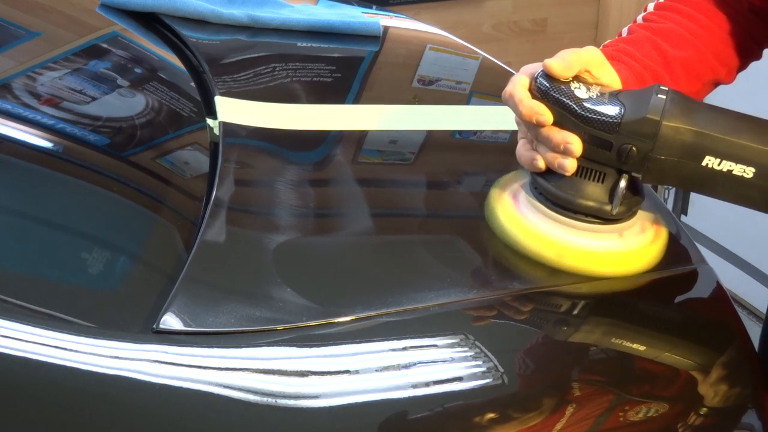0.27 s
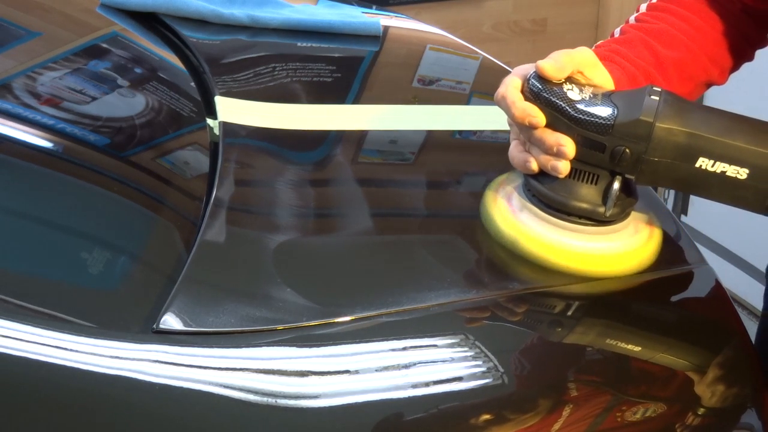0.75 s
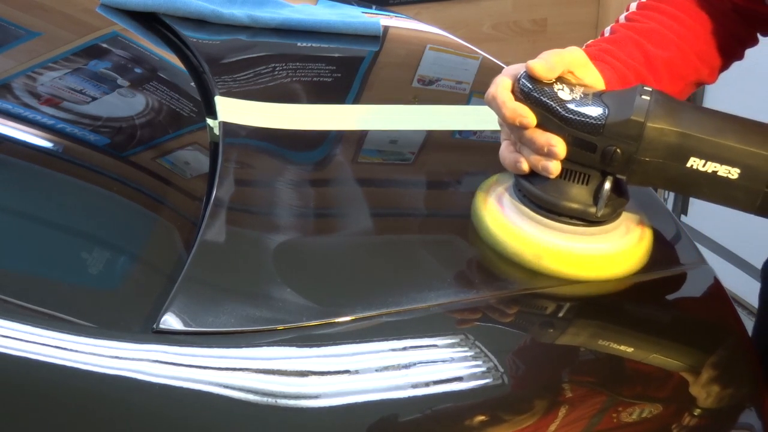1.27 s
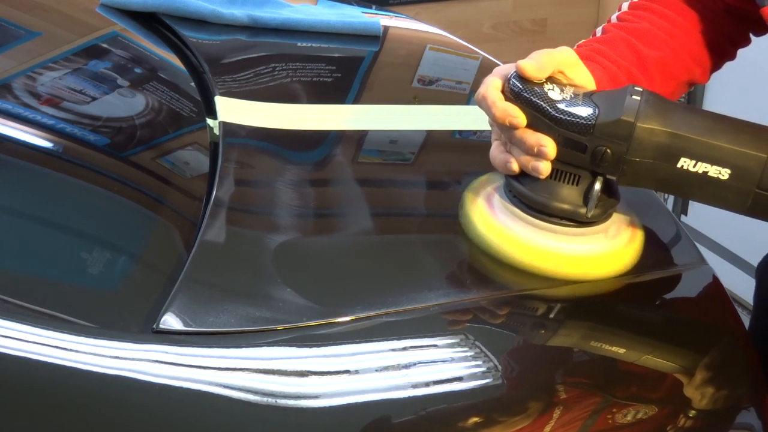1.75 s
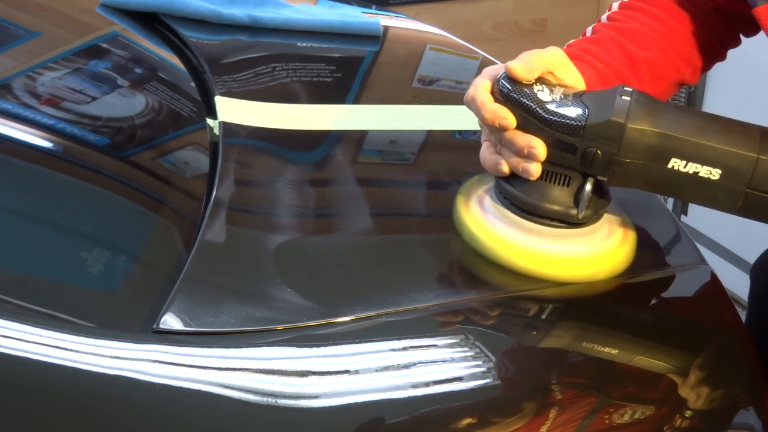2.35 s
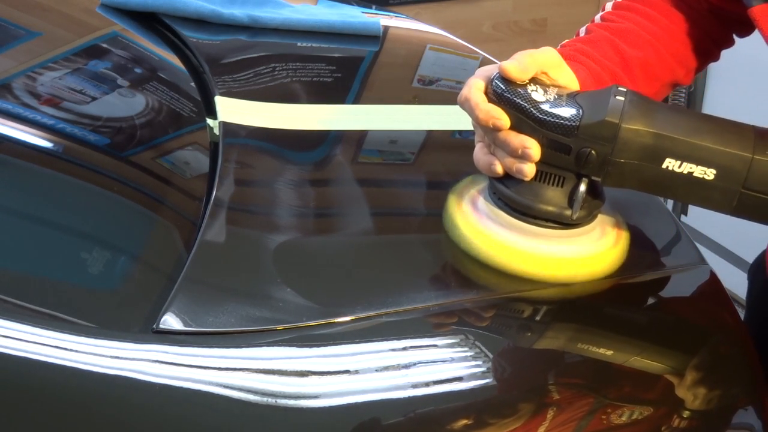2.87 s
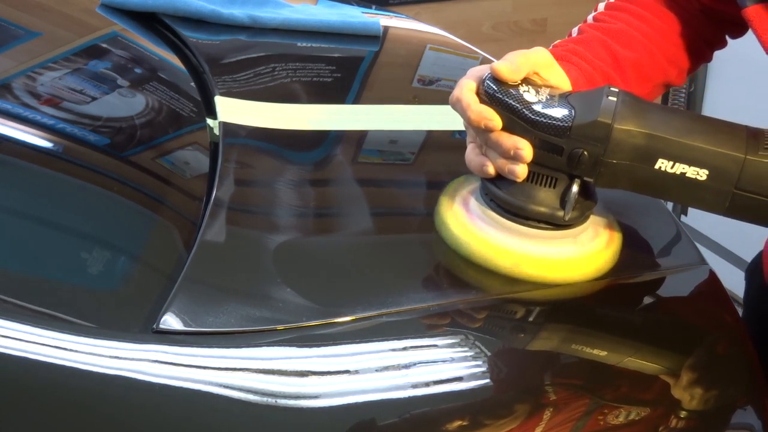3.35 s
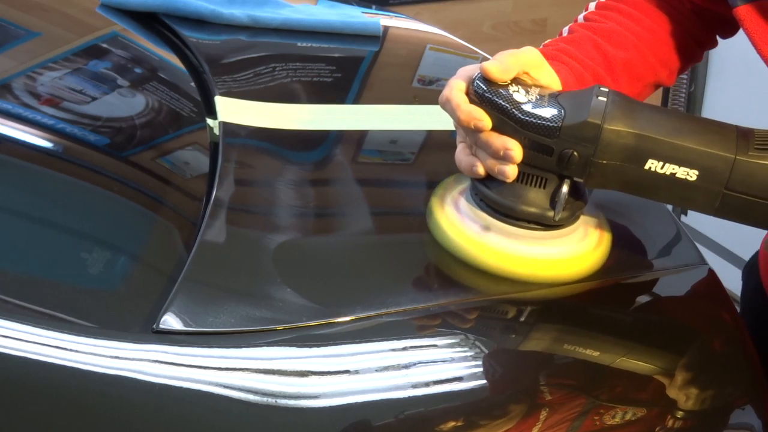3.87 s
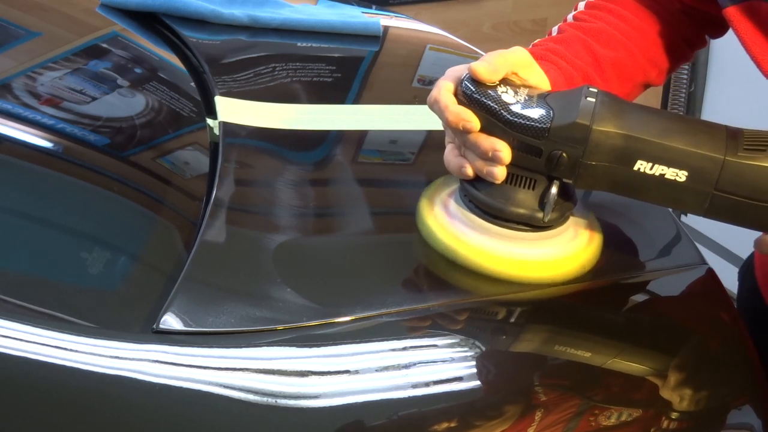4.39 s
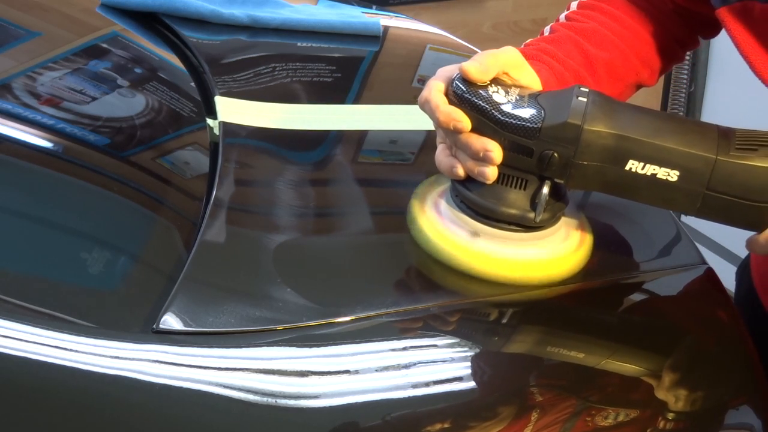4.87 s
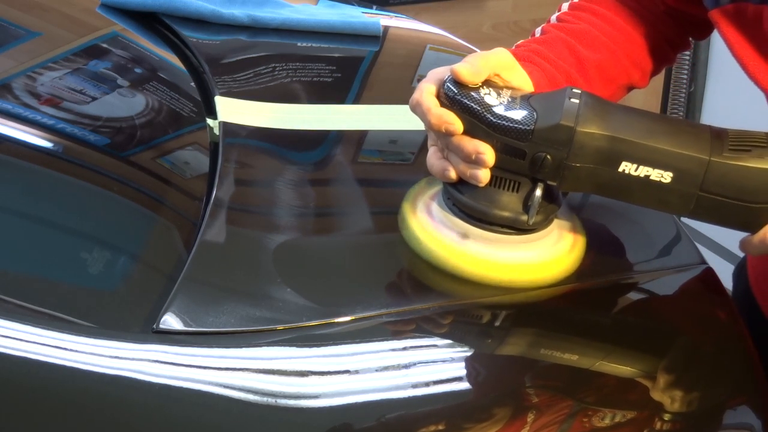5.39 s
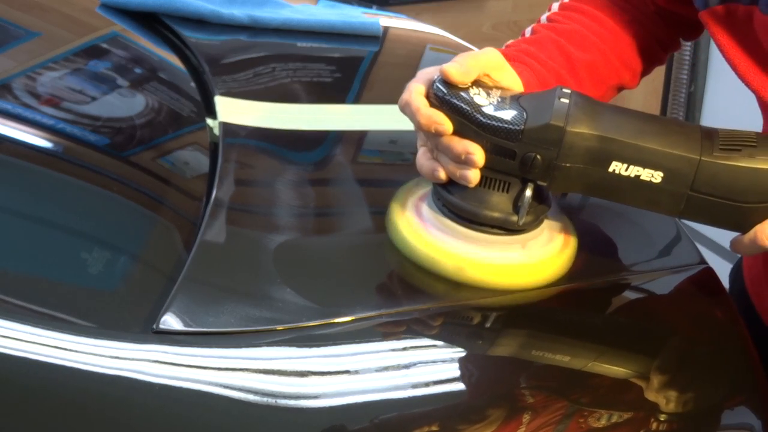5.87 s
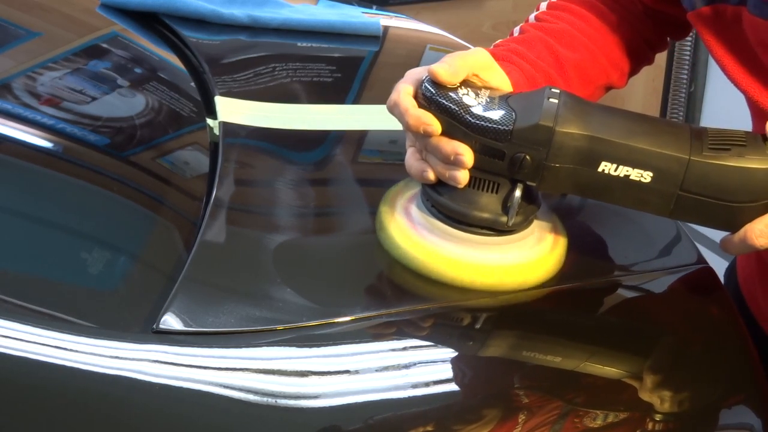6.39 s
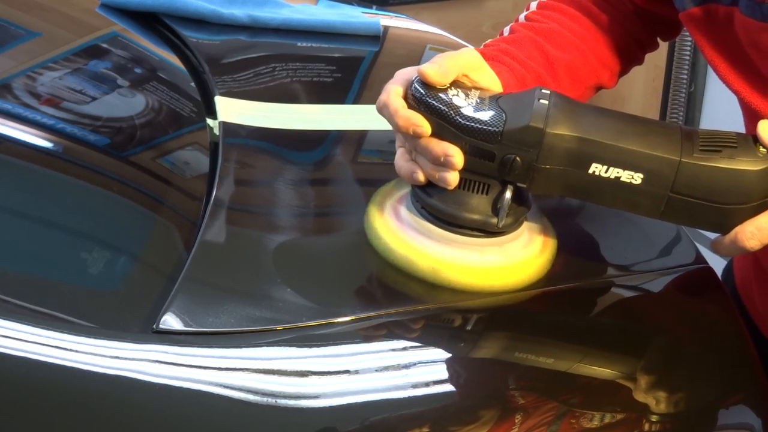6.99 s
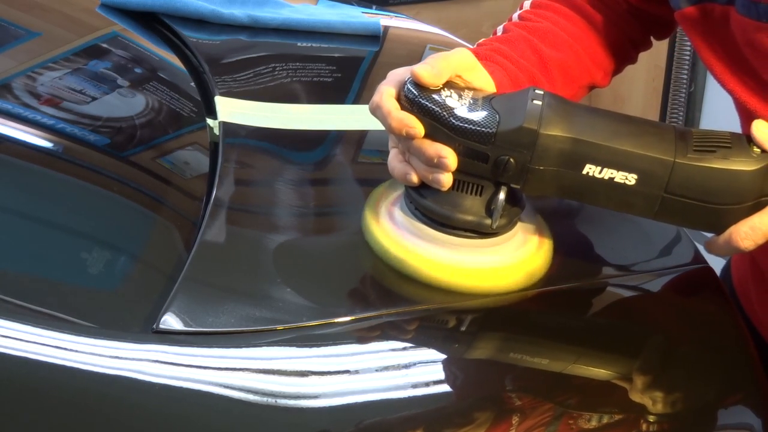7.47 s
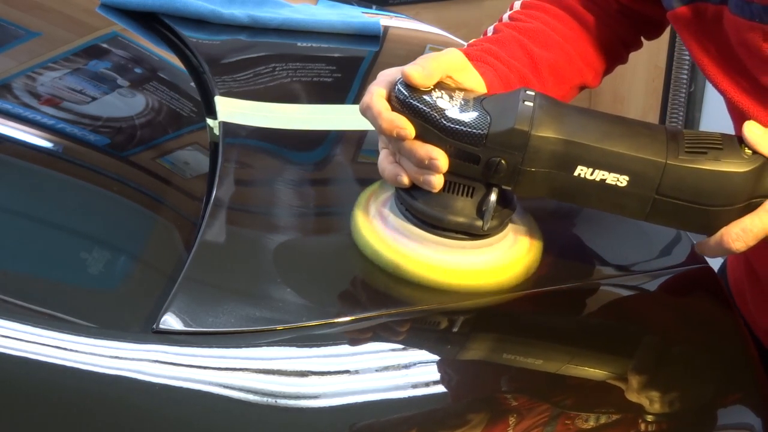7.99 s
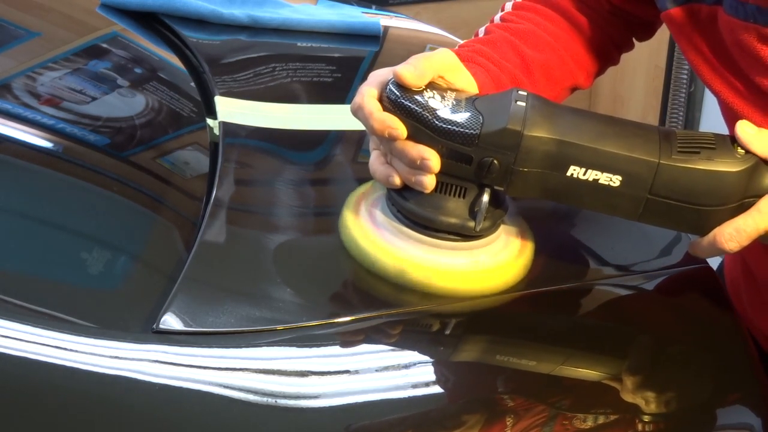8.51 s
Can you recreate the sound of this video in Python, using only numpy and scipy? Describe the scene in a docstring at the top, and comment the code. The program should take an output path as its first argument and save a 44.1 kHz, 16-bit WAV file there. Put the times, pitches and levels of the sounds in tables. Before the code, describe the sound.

An electric orbital polisher runs without a break on a car panel in a workshop, heard close and slightly to the right in stereo. A steady mid-low hum carries a dense geared whine, cooling air and brush hiss, while foam rubs softly. Single tones swell and fade; halfway through, the hand presses harder, the hum weakens and a thin whistle comes forward, then the motor speeds up very slightly.

```python
"""An electric random-orbital polisher is guided slowly over a car's painted panel in a workshop.
From the start the motor hums and whines near 368 turns a second, its 9:43 bevel gear driving the orbiting
pad; foam rubs, cooling air rushes and carbon brushes hiss. Bodywork reflections make single tones swell
and fade. Near 5 s the hand bears down and the pad spins slower; a thin whistle is heard near 4.7 and 6.5 s.
The hum weakens until nearly 8 s and partly recovers as the motor speeds up to 371 turns a second."""
import sys
import numpy as np
from scipy import signal
from scipy.fft import rfft, irfft, next_fast_len
from scipy.io import wavfile
from scipy.ndimage import map_coordinates

SR = 44100
rng = np.random.default_rng(int(sys.argv[2]) if len(sys.argv) > 2 else 0)


def unload_audio(sound):
    """Save the sound as a 16-bit wav file, at the path given as the first command line argument."""
    columns = np.transpose(np.atleast_2d(sound))
    # keep every value between -1 and 1, then stretch to whole-number steps
    steps = np.round(np.clip(columns, -1, 1) * 32767)
    wavfile.write(sys.argv[1], SR, steps.astype(np.int16))


N = 385434
TIME = np.arange(N) / SR
SIDES = np.array([[1], [-1]])  # left, right
PINION_TEETH, CROWN_TEETH = 9, 43


def gain_of(db):
    """Decibels to amplitude."""
    return 10 ** (np.asarray(db) / 20)


def evened(x):
    """Scales to rms 1."""
    return x / np.sqrt(np.mean(abs(x) ** 2) + 1e-20)


def curves(rows):
    """Each column of a table as a curve in time."""
    s, *columns = np.transpose(rows)
    return [np.interp(TIME, s, column) for column in columns]


def bell(s, width_s):
    """Smooth rise to 1 and fall around a moment."""
    return np.exp(-((TIME - s) / width_s) ** 2)


def read(points, hz):
    """Table values at the given frequencies, interpolated over log frequency."""
    f, value = np.transpose(points)
    return np.interp(np.log(hz + 1), np.log(f + 1), value)


def drift(top_hz):
    """Random wander of rms about 1: sines from a tenth of the top rate up to it."""
    hz = np.geomspace(top_hz / 10, top_hz, num=20)[:, None]
    coarse_s = TIME[::256]
    sines = np.sin(2 * np.pi * (hz * coarse_s + rng.random(hz.shape)))
    return np.interp(TIME, coarse_s, evened(sines.sum(0)))


def scatter(shape):
    """Complex random gains of rms 1."""
    return (rng.standard_normal(shape) + 1j * rng.standard_normal(shape)) / np.sqrt(2)


def rush(spectrum, apart, ripple_db):
    """Coloured noise on two microphones, rippled by the many small resonances of housing and room."""
    size = next_fast_len(N)
    hz = np.fft.rfftfreq(size, 1 / SR)
    grid_hz = np.arange(0, SR / 2, 45)
    ripple = np.interp(hz, grid_hz, rng.standard_normal(len(grid_hz)))
    bins = scatter(len(hz)) + apart * SIDES * scatter(len(hz))
    noise = irfft(bins * gain_of(read(spectrum, hz) + ripple_db * ripple), size)[:, :N]
    return noise / noise.mean(0).std()


def tone(turns, db, apart):
    """One partial, with a small random waver between left and right."""
    angle = 2 * np.pi * (turns + rng.random())
    side = drift(9.6) * np.cos(angle) + drift(11) * np.sin(angle)
    return gain_of(db) * (np.sqrt(2) * np.cos(angle) + apart * SIDES * side)


def rotor(turns, orders, db, fading, apart, count=12, size=8192):
    """A sound that repeats every turn; its partials fade in and out along the path of the tool."""
    shared, side = signal.resample(scatter((2, count, len(orders))), count * 10, axis=1)
    gains = np.exp(2j * np.pi * rng.random(len(orders))) + fading * shared
    gains /= np.sqrt(np.mean(abs(gains) ** 2, axis=0))
    bins = np.zeros((2, len(gains), size // 2 + 1), complex)
    stereo = np.array([gains + apart * side, gains - apart * side])
    bins[:, :, np.round(orders).astype(int)] = stereo * gain_of(db)
    cycles = irfft(bins, size) * size / np.sqrt(2)
    # read each cycle by shaft angle while crossfading along the path
    place = [np.linspace(0, len(gains) - 1, N), turns % 1 * size]
    return np.array([map_coordinates(c, place, order=1, mode="grid-wrap") for c in cycles])


def whine(track, spin, course, flutter_db, rough_db):
    """One tone that swells and fades over time, its level varying with each spin of the pad."""
    level_db, crossings = course
    path_db = sum(change_db * bell(s, width_s) for s, width_s, change_db in crossings)
    waver_db = flutter_db * np.cos(2 * np.pi * spin) + rough_db * drift(14)
    return tone(track, level_db + path_db + waver_db, apart=.22)


def pad_spin():
    """Turns of the pad about its own centre; it slows once, as the hand bears down."""
    free_hz, pressed_hz, slows_at_s, slows_over_s = 4.25, 3.63, 5.0, .3
    facing_s = 6.94  # reflection in step with the hum: turn zero
    slowed = (1 + np.tanh((TIME - slows_at_s) / slows_over_s)) / 2
    spin = np.cumsum(free_hz + (pressed_hz - free_hz) * slowed) / SR
    return spin - np.interp(facing_s, TIME, spin)


def hum(turns, spin, hum_db):
    """The armature's hum beats with its reflection off the spinning pad, deeply where the direct path is weak."""
    echo_db, rise_db, rise_at_s, rise_width_s = -41.5, 9, 6.95, 1.2
    echo_gain = gain_of(echo_db + rise_db * bell(rise_at_s, rise_width_s))
    both = gain_of(hum_db + 1.07) + echo_gain * np.exp(-2j * np.pi * spin)
    return abs(both) * tone(turns + np.angle(both) / (2 * np.pi), 0.38 * drift(10), apart=.11)


def motor(turns, press_db):
    """Overtones of the hum grow with the load; commutator bars whine above."""
    # Each row: cycles per motor turn, relative level in dB.
    motor_partials = [(3, -46.2), (5, -52.5), (6, -43.1), (7, -43.4), (8, -48.7), (10, -50.3), (11, -51.7),
                      (13, -47.3), (15, -52.1), (16, -46.0), (17, -47.1), (19, -44.3), (20, -52.3),
                      (21, -49.4), (22, -39.6), (23, -34.1), (24, -33.1), (25, -40.6), (26, -36.0),
                      (27, -34.6), (28, -48.0), (29, -48.6)]
    orders, db = np.transpose(motor_partials)
    low = orders < 5.5
    drone = rotor(turns, orders[low], db[low], fading=0.53, apart=.22)
    bars = rotor(turns, orders[~low], db[~low], fading=.5, apart=.22)
    drone_db = -0.9 + 1.4 * press_db + 0.63 * drift(8.7)
    return drone * gain_of(drone_db) + bars * gain_of(0.16 + 0.86 * press_db)


def whines(turns, orbit, spin):
    """Hum overtones, tooth mesh and its octave, a motor order and two crown-wheel orders."""
    # Each course: base level in dB, then rows of the crossing of a standing wave's crest or node:
    # moment in seconds, half width in seconds, change in dB.
    hum_octave = (-43, [(8.35, .7, 7.5)])
    hum_double_octave = (-53.5, [(2.3, 2.4, 8.6)])
    mesh_course = (-37, [(7.2, 0.33, -18)])
    mesh_octave = (-35, [(0, 1.1, -4), (6.8, 1.4, -14)])
    motor_whine = (-34.5, [(.6, 0.3, 7), (1.65, 1, -13), (6.3, 0.53, -6), (7.4, .4, 3.5),
                   (8.25, 0.37, -11)])
    low_gear_whine = (-34.5, [(7.45, 0.79, -6)])
    high_gear_whine = (-32, [(.5, 4.6, -6.5), (7.2, .2, -6), (8.25, .8, -18)])
    mesh = PINION_TEETH * turns
    voices = [
        (2 * turns, hum_octave), (4 * turns, hum_double_octave),
        (mesh, mesh_course), (2 * mesh, mesh_octave), (12 * turns, motor_whine),
        (31 * orbit, low_gear_whine), (47 * orbit, high_gear_whine)]
    return sum(whine(track, spin + rng.random(), course, flutter_db=1.25, rough_db=0.82)
               for track, course in voices)


def gear(orbit):
    """Uneven teeth repeat their pattern every orbit: strong partials over a dense, faint buzz."""
    # Uneven teeth of the crown wheel. Each row: cycles per orbit, relative level in dB.
    tooth_partials = [(4, -46), (5, -41), (8, -48), (19, -47), (29, -45), (35, -41), (36, -46), (37, -44),
                      (39, -48), (40, -43), (44, -41), (45, -46), (46, -48), (49, -49), (54, -45),
                      (55, -47), (56, -43), (57, -43), (59, -43), (60, -45), (83, -45), (85, -46),
                      (96, -48), (107, -45), (108, -46), (111, -46), (115, -43)]
    orders, db = np.transpose(tooth_partials)
    faint = np.setdiff1d(np.arange(28, 130), np.round(orders))
    buzz_db = -53.5 + 2.0 * rng.standard_normal(len(faint))
    strong = gain_of(-1.5) * rotor(orbit, orders, db, fading=0.53, apart=0.39)
    return strong + rotor(orbit, faint, buzz_db, fading=1.0, apart=0.33)


def throb(orbit, press_db):
    """The eccentric shakes the panel once an orbit; pressing harder brings out the overtones."""
    # Overtones of the shaking panel. Each row: cycles per orbit, dB against the throb at usual pressure.
    shake = [(2, -6), (3, -24), (6, -25)]
    throb_db = -31.9 + 1.1 * press_db
    sound = tone(orbit, throb_db - .3 + .4 * drift(6), apart=.11)
    for k, db in shake:
        sound += tone(k * orbit, throb_db + db + 0.53 * k * press_db + drift(7.1), apart=0.13)
    return sound


def rocking(turns, orbit, press_db):
    """The orbit rocks the motor, setting a side tone on each side of its hum."""
    db = -49.5 + 4.0 * press_db
    return sum(tone(turns + side * orbit, db + drift(4), apart=.2) for side in (-1, 1))


def pad(orbit, spin, press_db):
    """Foam scrubs to and fro, gripping unevenly as the pad turns."""
    # Foam on the panel. Each row: frequency in Hz, relative density in dB per Hz.
    foam_spectrum = [(12, -31), (24, -17), (54, -4), (86, -4.5), (120, -9.5), (224, -12.5), (343, -5),
                     (368, -1.5), (447, -7), (672, -4.5), (721, -2), (831, -4.5), (1657, -10), (2049, -12),
                     (2500, -32.5)]
    stroke = 1 + .08 * np.cos(2 * np.pi * orbit) + 0.087 * np.cos(2 * np.pi * 2 * orbit)
    grip_db = .5 * np.cos(2 * np.pi * spin) + 0.85 * drift(25)
    foam = rush(foam_spectrum, apart=0.26, ripple_db=2.74)
    return foam * stroke * gain_of(-30.5 + .9 * press_db + grip_db)


def housing(hum_db):
    """Turbulence rings in the motor housing; it carries as well or as badly as the hum does."""
    # Air resonances. Each row: frequency in Hz, width in Hz, relative level in dB.
    resonances = [(343, 91, 0.5), (518.4, 18, -2), (601, 46, -0.5)]
    hz = np.fft.rfftfreq(N, 1 / SR)
    cavity = sum(gain_of(db) / (1 + (2 * (hz - f) / width) ** 2) for f, width, db in resonances)
    noise = irfft(cavity * (scatter(len(hz)) + 0.25 * SIDES * scatter(len(hz))), N)
    return evened(noise) * gain_of(hum_db - 14.0 + 1.7 * drift(13))


def air(orbit, press_db):
    """Cooling air and gear rustle, fluttering with the orbit."""
    # Each row: frequency in Hz, relative density in dB per Hz.
    air_spectrum = [(1700, -21), (2049, -10), (2230, -1.5), (2886, 0.5), (3010, 0), (3451, -5.5), (3599, 2),
                    (4020, -4.5), (4419, 1.5), (5175, -6), (5720, -5.5), (6456, -3), (7600, -6),
                    (8300, -33)]
    lobes = 3 * orbit
    flutter = 1 + 0.12 * np.cos(2 * np.pi * orbit) + .14 * np.cos(2 * np.pi * lobes)
    level_db = -26.0 + 0.9 * press_db + 0.93 * drift(12)
    return rush(air_spectrum, apart=0.24, ripple_db=3.1) * flutter * gain_of(level_db)


def brushes(turns, orbit, press_db):
    """Two carbon brushes scrape the commutator, pulsing with the mains current and the gear load."""
    # Each row: frequency in Hz, relative density in dB per Hz.
    brush_spectrum = [(7000, -47), (7500, -15), (8278, 0.5), (9770, -5.5), (9919, -3.5), (10195, -10.5),
                      (10949, -10), (11800, -46)]
    passes, lobes, mains = 2 * turns, 3 * orbit, 100 * TIME
    pulses = [(passes, .27), (lobes, .2), (mains, .14), (orbit, .12)]  # (cycles, depth)
    contact = 1 + sum(depth * np.cos(2 * np.pi * cycles) for cycles, depth in pulses)
    level_db = -25.0 + 0.42 * press_db + 0.58 * drift(12)
    return rush(brush_spectrum, apart=0.21, ripple_db=4.5) * contact * gain_of(level_db)


def workshop():
    """Faint, diffuse rumble of the room."""
    # Each row: frequency in Hz, relative density in dB per Hz.
    rumble_spectrum = [(12, -8), (30, 1), (55, 10), (130, -9), (300, -8), (900, -58)]
    return gain_of(-52.0) * rush(rumble_spectrum, apart=0.51, ripple_db=3)


def whistle(turns, spin):
    """A thin, high motor order, louder near 4.7 and 6.5 s, its level varying with the pad's spin."""
    # Base level in dB, then rows of moment in seconds, half width in seconds, change in dB.
    whistle_course = (-53, [(4.72, 0.34, 14), (6.55, 0.81, 23.7)])
    return whine(30 * turns, spin, whistle_course, flutter_db=4.5, rough_db=2.5)


def scene():
    """All parts follow one shaft, swaying a little with each spin of the pad, and the pressure of the hand."""
    # Each row: time in seconds, motor speed in turns per second.
    motor_speed = [(0, 368.22), (0.35, 367.65), (0.9, 367.88), (1.4, 368.29), (2.4, 367.85), (3.1, 368.0),
                   (3.6, 367.68), (4.1, 367.94), (4.75, 367.47), (5.55, 367.93), (6.2, 367.33),
                   (6.7, 367.15), (7.25, 367.61), (7.55, 368.41), (8.0, 369.68), (8.45, 370.04),
                   (8.74, 371.29)]
    # Each row: time in seconds, pad pressure on the panel in dB against the usual.
    hand_pressure = [(0, -1.2), (1.2, -1.35), (4.6, -0.5), (5.2, -0.6), (5.85, 1), (6.25, 0.5), (6.9, 1.1),
                     (7.3, 2.15), (8.3, 2.5), (8.74, 1.5)]
    # Hum on its direct path, one cycle per turn. Each row: time in seconds, relative level in dB.
    hum_level = [(0, -21.5), (2.4, -19.5), (4.1, -20.5), (5.3, -22.5), (6.3, -27.4), (7.1, -30),
                 (7.75, -31.2), (8.2, -27.1), (8.74, -27)]
    speed, = curves(motor_speed)
    press_db, = curves(hand_pressure)
    hum_db, = curves(hum_level)
    spin = pad_spin()
    turns = np.cumsum(speed + .22 * np.cos(2 * np.pi * spin) + .07 * drift(20)) / SR
    orbit = turns * PINION_TEETH / CROWN_TEETH
    drive = hum(turns, spin, hum_db) + motor(turns, press_db) + whines(turns, orbit, spin) + gear(orbit)
    shaking = throb(orbit, press_db) + rocking(turns, orbit, press_db)
    noise = pad(orbit, spin, press_db) + housing(hum_db)
    noise += air(orbit, press_db) + brushes(turns, orbit, press_db)
    return drive + shaking + noise + workshop() + whistle(turns, spin)


def record(dry):
    """The tool sits a little to the right of the microphones; then the band limit."""
    # Each row: frequency in Hz, left minus right in dB.
    lean = [(60, -0.2), (140, -1.2), (350, -1.7), (830, -2.5), (2000, -1.5), (4810, -2.5), (11600, -1.1)]
    edge_hz = 11060
    size = next_fast_len(N)
    lean_db = SIDES * read(lean, np.fft.rfftfreq(size, 1 / SR)) / 2
    heard = irfft(rfft(dry, size) * gain_of(lean_db), size)[:, :N]
    lowpass = signal.firwin(1501, edge_hz, window=("kaiser", 9), fs=SR)
    return signal.oaconvolve(heard, lowpass[None], "same")


dry = scene()
out = record(dry)
unload_audio(out)
```